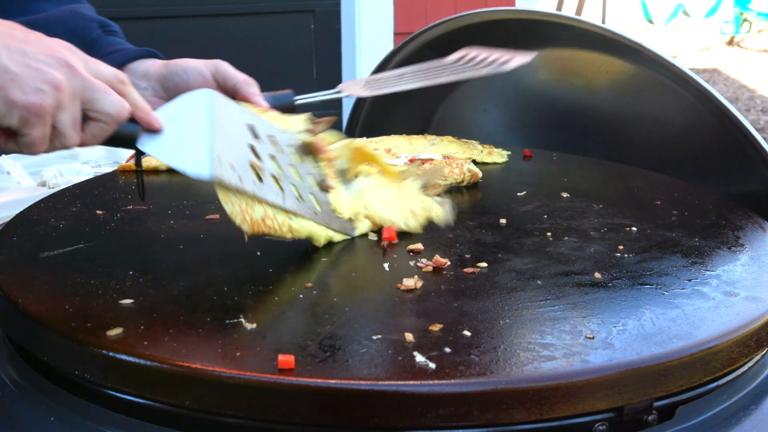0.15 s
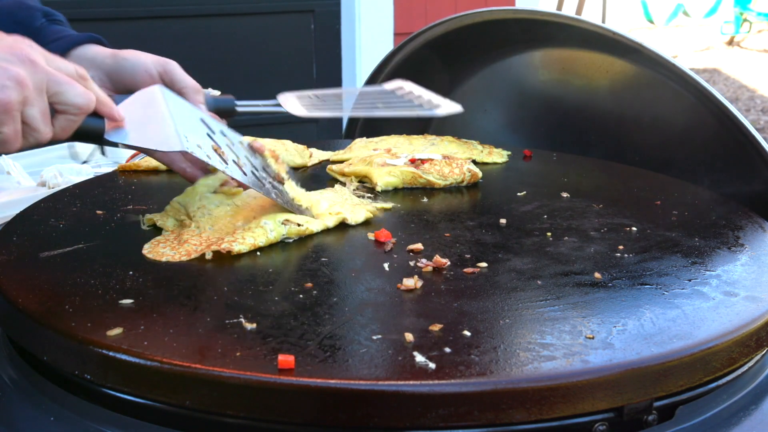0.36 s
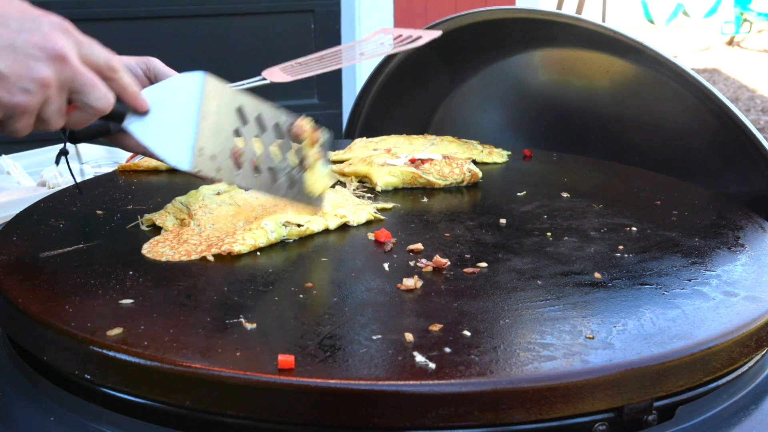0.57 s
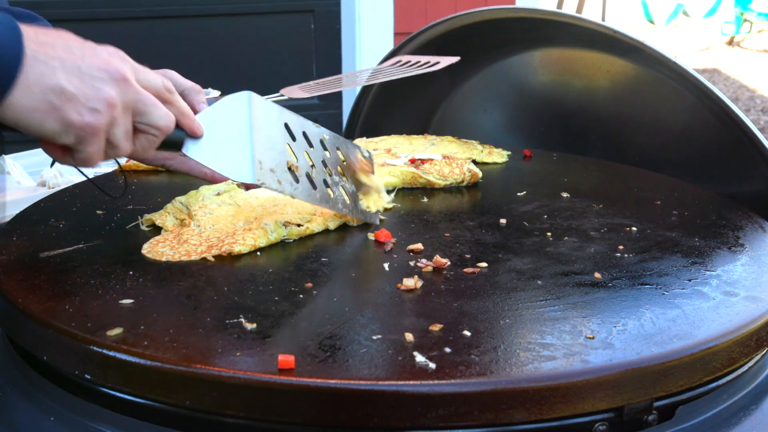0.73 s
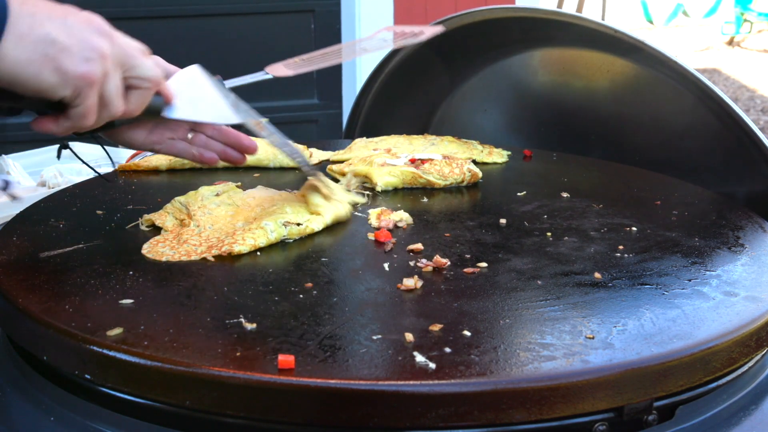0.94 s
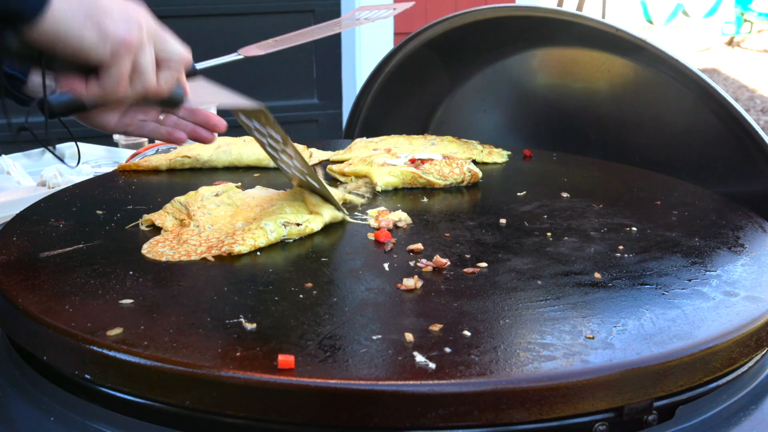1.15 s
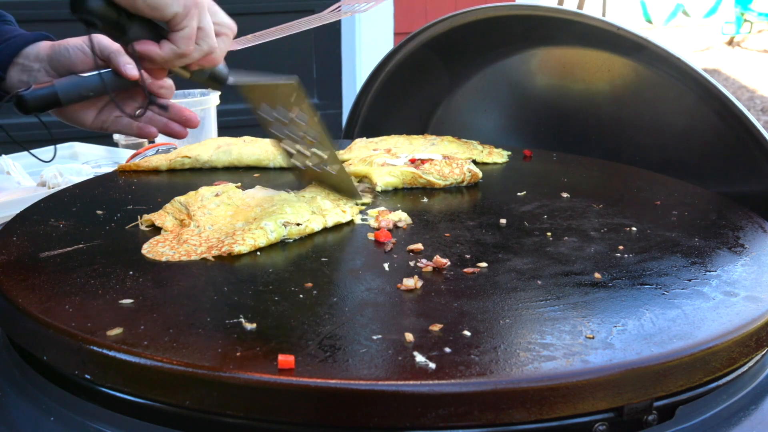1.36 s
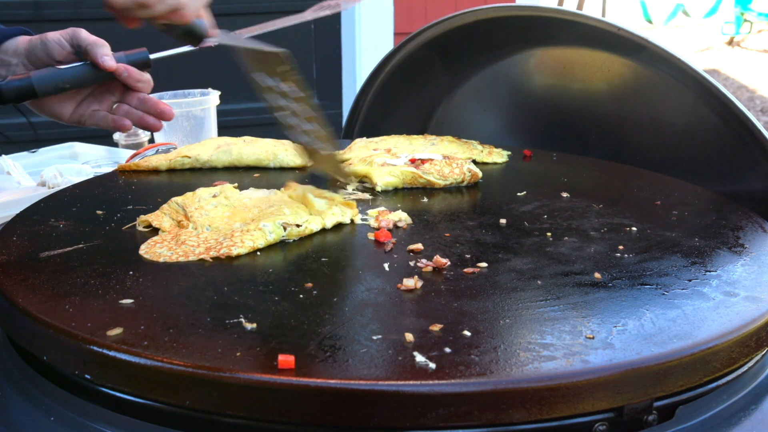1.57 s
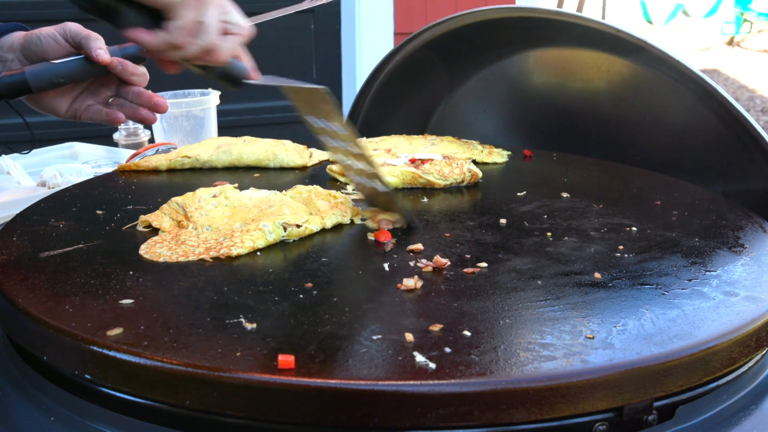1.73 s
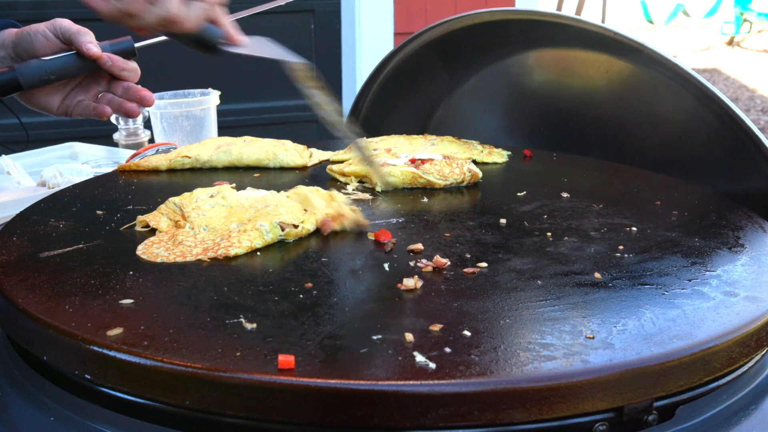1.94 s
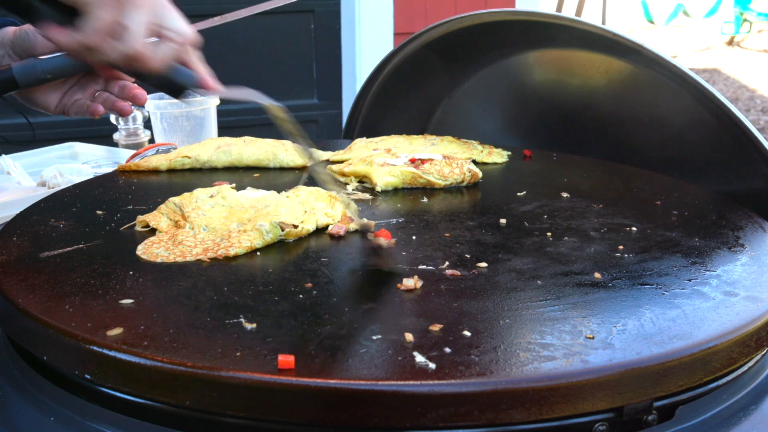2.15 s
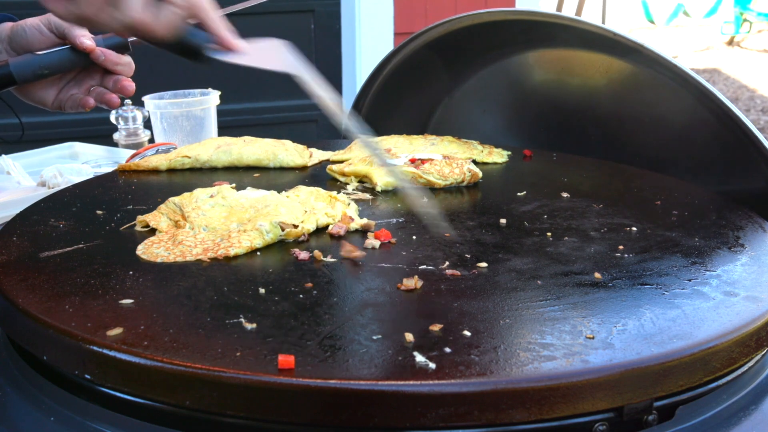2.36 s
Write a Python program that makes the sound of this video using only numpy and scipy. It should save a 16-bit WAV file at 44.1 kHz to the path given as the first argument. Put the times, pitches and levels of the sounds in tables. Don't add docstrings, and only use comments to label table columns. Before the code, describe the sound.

A metal spatula chops and scrapes on a steel griddle in five sharp, ringing strokes outdoors

```python
import sys
import numpy as np
from scipy import signal
from scipy.fft import rfft, irfft
from scipy.io import wavfile

SR = 44100
rng = np.random.default_rng(int(sys.argv[2]) if len(sys.argv) > 2 else 0)


def volts_from_db(level):
    exponent = np.asarray(level, float) / 20
    return 10 ** exponent


def master(y):
    cut = np.clip(np.atleast_2d(y).T, -1, 1)
    pcm = np.round(cut * 32767)
    wavfile.write(sys.argv[1], SR, pcm.astype(np.int16))


N = 110250


def rms_one(x):
    return x / np.sqrt(np.mean(x ** 2) + 1e-20)


def at_hz(points, hz):
    p = np.array(points)
    return np.interp(np.log(np.maximum(hz, 1)), np.log(p[:, 0]), p[:, 1])


def in_time(rows):
    s, *columns = np.transpose(rows)
    return [np.interp(np.arange(N) / SR, s, column) for column in columns]


def butter(x, order, hz, kind):
    return signal.sosfilt(signal.butter(order, hz, kind, fs=SR, output="sos"), x)


def colour(x, spectrum):
    hz = np.fft.rfftfreq(len(x), 1 / SR)
    return rms_one(irfft(rfft(x) * volts_from_db(at_hz(spectrum, hz)), len(x)))


def drift(rate_hz):
    r = np.exp(-2 * np.pi * rate_hz / SR)
    noise = rng.standard_normal(N + SR)
    return rms_one(signal.lfilter([1], [1, -2 * r, r * r], noise)[SR:])


def grains(per_s, spread_db):
    when, size, sign = rng.random((3, N))
    return (when < per_s / SR) * volts_from_db(-spread_db * np.log(size + .01)) * np.sign(sign - .5)


def rings(hz, t60):
    t = np.arange(SR // 2)[None] / SR
    hz = np.array(hz)[:, None]
    t60 = np.maximum(np.array(t60)[:, None], .003)
    return np.sin(2 * np.pi * hz * t) * volts_from_db(-60 * t / t60) / np.sqrt(t60)


def alternate(count):
    return (-1) ** np.arange(count)


BITE_DB = [-28, -10, -0.5, 3, -8, -6]
# (time [s], strength [dB], contact lowpass [Hz], bounce delay [s], tick level [dB])
KNOCKS = [
    (0.7694, -24.5, 2490, 0.0044, -43),
    (1.1335, -29.5, 5750, 0.0042, -41),
    (1.4393, -26, 2680, 0.014, -42),
    (1.756, -26, 7000, 0.0036, -47),
    (2.135, -28, 9400, 0.0035, -32),
]
# (time [s], drag level [dB], thinning of the lows [dB])
DRAGS = [
    [(0, -53, -8.5), (.1, -59.5, -8), (.17, -49.5, -3), (.2, -51, -6), (.23, -58, 8), (.28, -55.5, 1)],
    [(.77, -30.5, -9.5), (.81, -38, 7.5), (.83, -31, 1.5), (.886, -29.5, 27), (.905, -53, 7),
     (.925, -68, -6)],
    [(1.135, -30, 0.5), (1.16, -34, -0.5), (1.18, -37.5, 15), (1.2, -34.5, 26), (1.21, -54, 13.5),
     (1.225, -62, -3)],
    [(1.44, -36.5, -5.5), (1.452, -41.5, -8.5), (1.462, -55.5, -11), (1.48, -72, 11), (1.5, -59, 0)],
    [(1.757, -26.5, 2), (1.792, -42.5, -6.5), (1.826, -23, 40), (1.86, -25, 19), (1.888, -34.5, 19),
     (1.91, -52, 16), (1.93, -83, 6)],
    [(2.136, -42.5, -11.5), (2.16, -39, -1.5), (2.193, -28.5, 4.5), (2.212, -23, 7.5), (2.245, -27, 3.5),
     (2.293, -36.5, 11), (2.33, -51, 10)],
]


def spatula():
    direct = colour(signal.unit_impulse(256, 128), PLATE_BODY)
    out, slips = np.zeros(N), catches()
    for k, drag in enumerate(DRAGS):
        body = response(k)
        force = scrape(drag, BITE_DB[k]) * slips
        out += volts_from_db(-8) * signal.fftconvolve(force, direct / 16)[128:N + 128]
        if k:
            force += knock(*KNOCKS[k - 1][:4])
        else:
            force[0] = force[:2000].std() * 15.0
        out += signal.fftconvolve(force, body)[:N]
    return butter(out, 2, 150, "high")


def knock(s, db, dull_hz, lag, bounce_db=-15):
    blow = np.zeros(N)
    blow[[int(s * SR), int((s + lag) * SR)]] = volts_from_db(db + 30), volts_from_db(db + 30 + bounce_db)
    return butter(blow, 1, min(dull_hz, .45 * SR), "low")


def scrape(drag, bite_db, split_hz=1500):
    t = np.arange(N) / SR
    level_db, thin_db = in_time(drag)
    grit = rms_one(grains(per_s=6000, spread_db=4))
    grit = volts_from_db(-2 * thin_db) * butter(grit, 2, split_hz, "low") - butter(grit, 2, split_hz, "high")
    top = signal.sosfiltfilt(signal.butter(2, 7500, "high", fs=SR, output="sos"), grit)
    grit = grit + (volts_from_db(bite_db) - 1) * top
    chatter_db = drift(55.6)
    touching = (t >= drag[0][0]) * (t < drag[-1][0])
    return grit * volts_from_db(level_db + chatter_db) * touching


# (time [s], jump [dB])
SLIPS = [(0.794, 9.5), (0.8258, 3), (0.853, 9), (0.861, 7), (.873, 5.5), (0.885, 2.5), (1.156, 4.5),
         (1.194, 7), (1.449, 6), (1.762, 6), (1.798, 8), (1.809, 5), (1.82, 7.5), (1.835, 5), (1.842, 4),
         (1.856, 4), (1.887, 11), (2.159, 6), (2.177, 2), (2.201, 5.5), (2.209, 6), (2.2224, 6), (2.237, 1),
         (2.255, 14), (2.278, -1), (2.288, 0)]


def catches(fade_s=0.002, stick_s=.003, stick_db=-6.5):
    t, gain = np.arange(N) / SR, np.ones(N)
    for s, db in SLIPS:
        burst = 1 + (volts_from_db(db) - 1) * np.exp(-np.maximum(t - s, 0) / fade_s)
        held = volts_from_db(stick_db * (t > s - stick_s))
        gain *= np.where(t >= s, burst, held)
    return gain


def response(k):
    body = dense_ring(k) + volts_from_db(-22) * slot_rings() + volts_from_db(-5) * plate_modes(k) + blade_modes(k)
    if k:
        body += slot_modes(k - 1)
    return rms_one(body) / np.sqrt(len(body))


# (frequency [Hz], t60 [s])
PLATE = [(192, .9), (403, .6), (489, 1.2), (511, 1.2), (730, .4), (790, .6), (810, 1.2), (903, 1.3),
         (1056, .8), (1275, .45), (1512, .4), (1976, .3), (2197, .36), (2326, .4)]
SPOTS = [
    [-7, -19, -12, 0.5, -20, -5, -3, 1.5, -6, -1, -12, -8, 1.5, -18],
    [-3, -12, -7, -6, 2, 1, -1, -3, -3, 3, -11, 6.5, 4, 6.5],
    [-3, -2, 8.5, -1, 3, 0, 1, -7.5, -7, 7.5, -13, -16, 0, -15],
    [6, -4.5, 0, -19, 3.5, 4, 6, -7, -4.5, -2, 5, -2, -1, -15],
    [0.5, -9, -2.5, -5, -5, 1.5, -2, -13, -24, -10, -17, 4.5, 6.5, -26],
    [-14, -12.5, -5.5, -27, 1.5, 6, 0, -8, 3, -7, 4, 4, -3, 0.5],
]


def plate_modes(k):
    hz, t60 = np.transpose(PLATE)
    return (volts_from_db(SPOTS[k]) * alternate(len(hz))) @ rings(hz, t60)


# (frequency [Hz], bandwidth [Hz], level [dB])
BLADE = [
    [(585, 65, 1.5), (1237, 19, -15), (1608, 82, 9.5), (2920, 27, -2), (5430, 370, -26)],
    [(1990, 400, 2.5), (2410, 170, 2), (2910, 33, 6), (3667, 110, 4.5), (4550, 180, 0), (5770, 36, 13.5),
     (7650, 22, -24)],
    [(2900, 15, 7.5), (3674, 110, 0), (4280, 61, -6), (5240, 270, -3.5), (6140, 73, 7.5), (7030, 44, 5),
     (7145, 26, 7.5)],
    [(212, 23, 6.5), (1180, 40, -2), (1550, 32, 2.5), (2300, 68, -8), (5020, 85, 0), (5800, 190, 9)],
    [(1610, 39, -2), (2150, 140, -8), (2965, 11, 6), (3555, 76, 0.5), (5850, 120, 4.5), (6640, 80, 5),
     (7550, 18, -25)],
    [(1540, 58, -4), (2210, 63, -2), (2670, 20, 2.5), (2866, 39, 5), (3240, 160, -2.5), (5800, 89, -11),
     (6630, 120, -3), (7100, 310, -0.5)],
]
BLADE_DB = [-5, -3, -0.5, -2, -2, -7]


def blade_modes(k):
    hz, width, db = np.transpose(BLADE[k])
    strength = volts_from_db(db) * np.sqrt(width) * alternate(len(hz))
    return volts_from_db(BLADE_DB[k]) * rms_one(strength @ rings(hz, 2.74 / width))


# (frequency [Hz], bandwidth [Hz], level [dB])
SLOTS = [
    [(8050, 120, -33), (8500, 74, -41), (9640, 150, -32), (11900, 150, -36)],
    [(8130, 40, -27), (8760, 53, -27), (11400, 94, -36), (13200, 80, -35)],
    [(9800, 140, -28), (11400, 120, -27)],
    [(8800, 130, -42), (10800, 200, -38), (12000, 100, -26), (14300, 220, -25)],
    [(9130, 60, -26), (10620, 180, -26), (12000, 100, -22.5), (12700, 110, -28)],
]


def slot_modes(chop):
    hz, width, db = np.transpose(SLOTS[chop])
    return volts_from_db(db) @ rings(hz, 2.4 / width) * 5.3


# (frequency [Hz], level [dB])
PLATE_BODY = [(130, -18), (220, -3), (800, -8), (2200, -4), (4000, -10), (6000, -2.5), (8000, -21),
              (15500, -33.5)]
# (frequency [Hz], t60 [s])
PLATE_T60 = [(150, 0.12), (400, 1), (1000, 0.45), (2800, 0.32), (4500, 0.12), (7000, 0.14), (15000, 0.046)]
LOWS_DB = [2, -5.5, -3, -2.5, -1, -3]


def dense_ring(k, lows_hz=740):
    t = np.arange(SR // 2) / SR
    hz = np.fft.rfftfreq(len(t), 1 / SR)
    white = rfft(colour(rng.standard_normal(len(t)), PLATE_BODY))
    white = white * volts_from_db(LOWS_DB[k] / (1 + (hz / lows_hz) ** 4))
    edges = np.geomspace(110, 17000, num=60)
    t60s = at_hz(PLATE_T60, np.sqrt(edges[1:] * edges[:-1]))
    out = np.zeros(len(t))
    for low, high, t60 in zip(edges, edges[1:], t60s):
        band = irfft(white * (hz >= low) * (hz < high), len(t))
        out += band * volts_from_db(-60 * t / t60) / np.sqrt(t60)
    return rms_one(out)


def slot_rings():
    hz = 7200 + 8500 * rng.random(size=30)
    strength = volts_from_db(at_hz(PLATE_BODY, hz)) * rng.standard_normal(len(hz))
    return rms_one(strength @ rings(hz, 0.017 * 6000 / hz))


def cracks(t60_s=0.029, low_hz=7000):
    out, t = np.zeros(N), np.arange(2000) / SR
    for s, *_, db in KNOCKS:
        i = int(s * SR)
        out[i:i + len(t)] += volts_from_db(db - 60 * t / t60_s) * rng.standard_normal(len(t))
    return butter(out, 2, low_hz, "high")


def lift(start_s=.225, hz=1057, db=-46, t60_s=.8, rise_s=.05):
    t = np.maximum(np.arange(N) / SR - start_s, 0)
    return volts_from_db(db - 60 * t / t60_s) * np.minimum(t / rise_s, 1) * np.sin(2 * np.pi * hz * t)


# (time [s], length [s], frequency [Hz], level [dB])
SHIVERS = [
    (0.581, 0.033, 1440, -56.5),
    (0.607, 0.042, 1520, -64),
    (0.71, 0.032, 1500, -65),
]


def shivers():
    t, out = np.arange(N) / SR, np.zeros(N)
    for s, length, hz, db in SHIVERS:
        swell = np.sin(np.pi * np.clip((t - s) / length, 0, 1))
        out += volts_from_db(db) * swell * np.sin(2 * np.pi * hz * t)
    return out


# (frequency [Hz], level [dB])
SIZZLE = [(2000, -19), (3500, -13), (4800, -9.5), (6300, -0.5), (7300, -8.5), (9000, -21.5), (16000, -20)]
# (time [s], level [dB])
SIZZLE_LEVEL = [(0, -63), (.17, -55.5), (.25, -58.5), (.5, -59.5), (2.5, -61)]


def sizzle():
    level_db, = in_time(SIZZLE_LEVEL)
    hiss = rms_one(grains(per_s=9000, spread_db=5.0))
    crackle = rms_one(grains(per_s=1000, spread_db=0.67))
    return volts_from_db(level_db + drift(8.4)) * colour(hiss + volts_from_db(-13) * crackle, SIZZLE)


# (time [s], peak level [dB], frequency [Hz], duration [cycles])
POPS = [(0.205, -39.5, 5900, 17), (.298, -50, 9000, 5), (.381, -41, 5100, 11), (0.43, -41, 5970, 8.4),
        (.54, -46, 5860, 8.3), (.698, -55, 11000, 5), (.917, -40, 11100, 6), (1.098, -50, 10000, 5.5),
        (1.254, -43.5, 5400, 14), (1.514, -58, 11400, 22), (1.5235, -57, 12000, 23),
        (1.523, -43, 5970, 9.3), (1.544, -47, 5850, 30), (1.594, -41.5, 12300, 6.8), (1.921, -50, 11200, 5),
        (1.947, -47, 12000, 5), (1.978, -55, 11500, 15), (1.997, -51, 9900, 5), (2.029, -46, 12000, 5),
        (2.039, -34.5, 9000, 3.5), (2.054, -42.5, 6100, 14), (2.093, -59, 12000, 5)]


def pops():
    out, t = np.zeros(N), np.arange(400) / SR
    for s, db, hz, cycles in POPS:
        i = int(s * SR)
        decay = volts_from_db(db + 10.5 - 60 * t * hz / max(cycles, 2))
        attack = np.minimum(t * hz, 1)
        out[i:i + 400] += decay * attack * np.sin(2 * np.pi * hz * t)
    return out


# (frequency [Hz], level [dB])
YARD = [(22, -6), (60, -5.5), (100, -4.5), (450, -9), (900, -15), (1450, -13), (2500, -19), (5000, -32)]


def yard():
    return volts_from_db(-56.5 + drift(30)) * colour(rng.standard_normal(N), list(YARD) + [(8000, -56)])


# (time [s], level [dB])
WIND = [(0, -75), (.15, -74), (.2, -55), (.35, -58), (.42, -68), (1.9, -65), (2.04, -57), (2.15, -73),
        (2.5, -84)]


def wind():
    level_db, = in_time(WIND)
    puffs = butter(rng.standard_normal(N + SR), 2, [15, 45], "band")[SR:]
    return volts_from_db(level_db) * rms_one(puffs)


def scene():
    steel = spatula() + cracks() + lift() + shivers()
    food = sizzle() + pops()
    return (steel + food + yard() + wind())[None]


def band_limit(x):
    return signal.sosfilt(signal.butter(12, 16530, fs=SR, output="sos"), x)


def record(dry, soft_top=0.51, cutoff_hz=16500):
    rounded = soft_top * np.tanh(dry / soft_top)
    mix = signal.sosfilt(signal.cheby2(10, 40, cutoff_hz, fs=SR, output="sos"), rounded)
    return band_limit(mix)


dry = scene()
out = record(dry)
master(out)
```